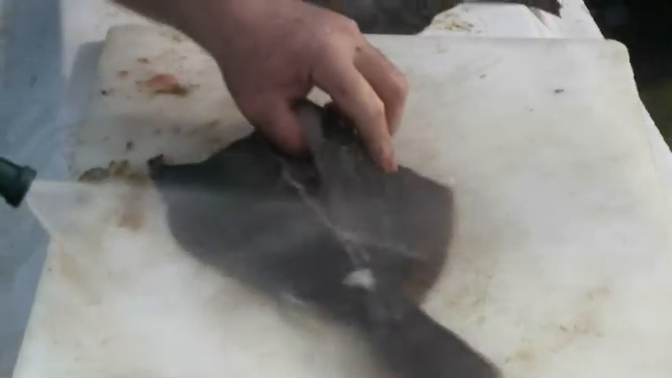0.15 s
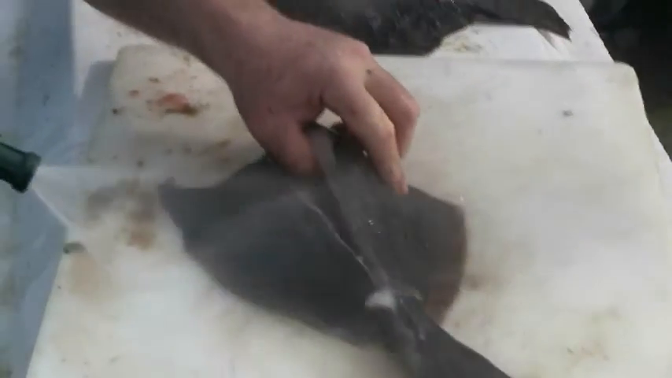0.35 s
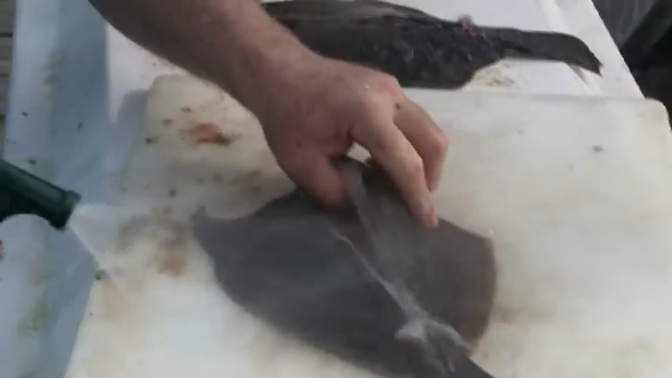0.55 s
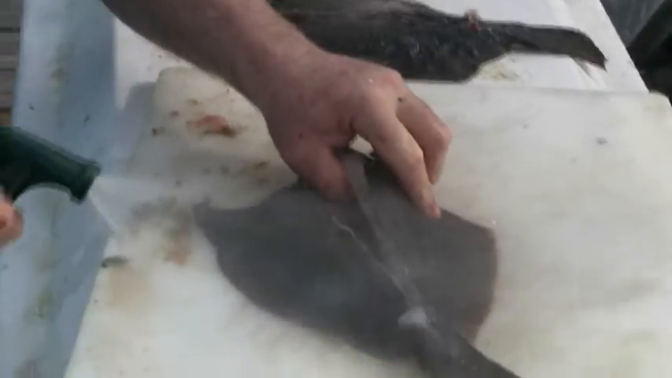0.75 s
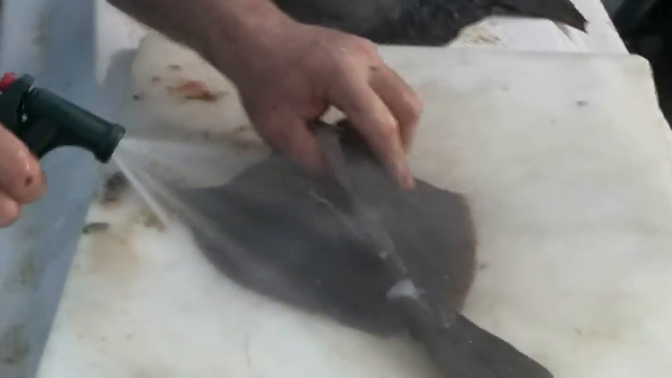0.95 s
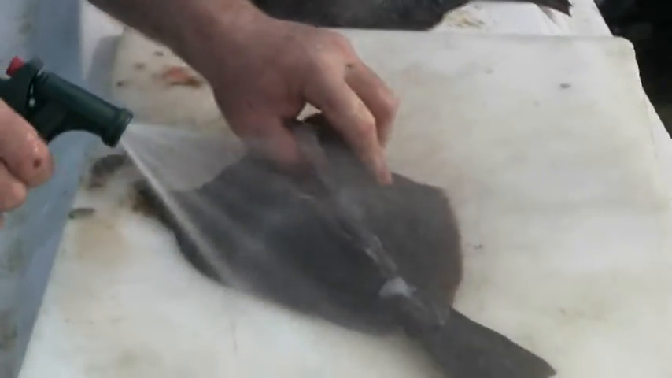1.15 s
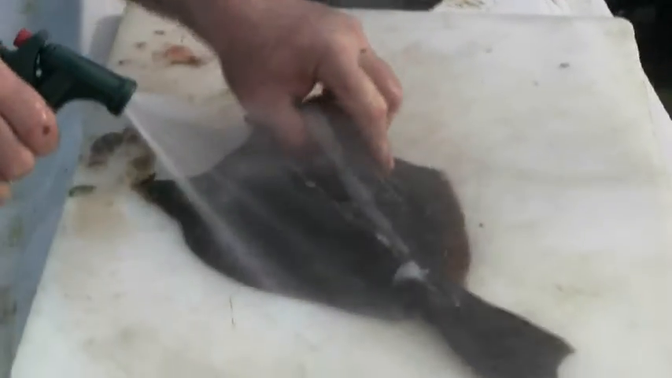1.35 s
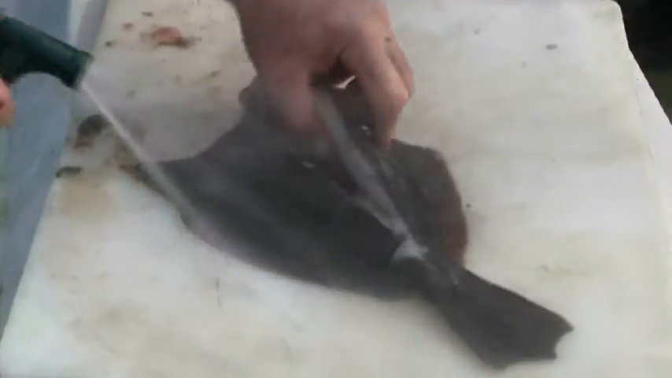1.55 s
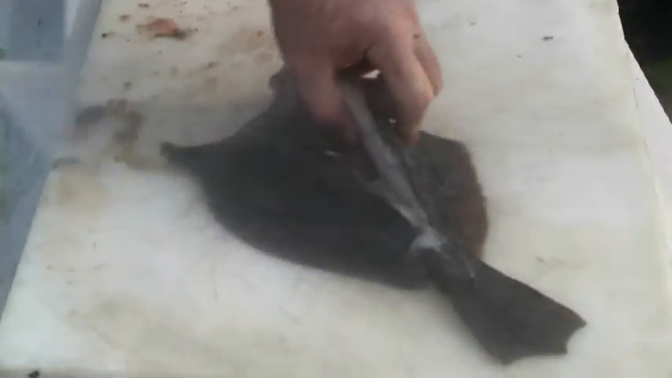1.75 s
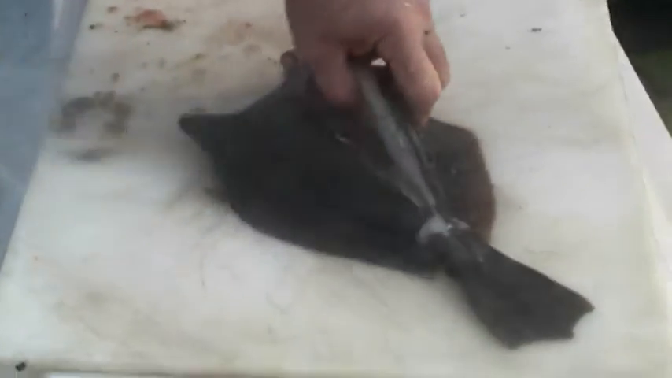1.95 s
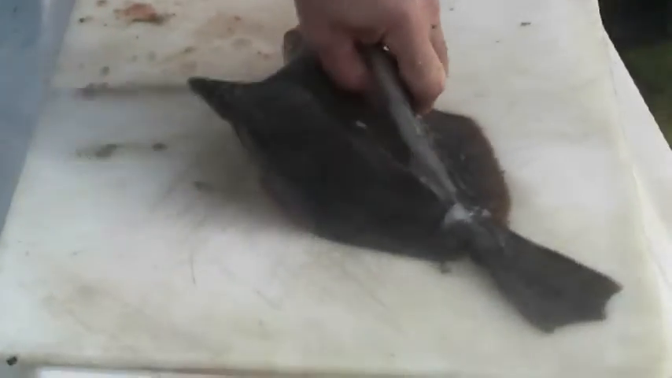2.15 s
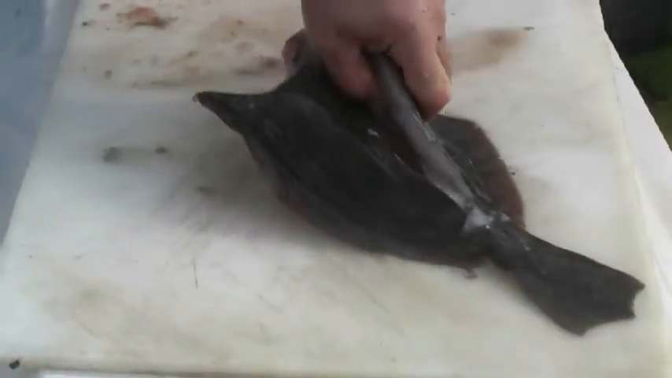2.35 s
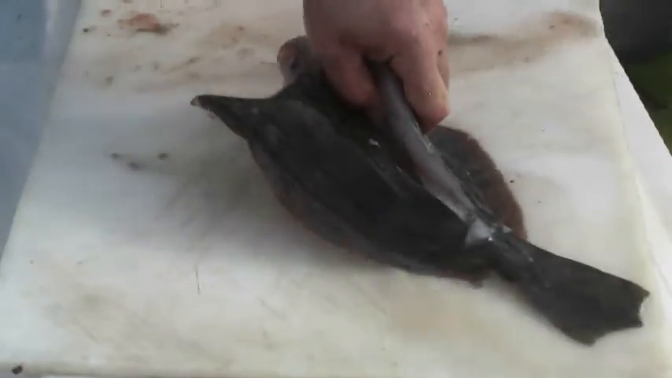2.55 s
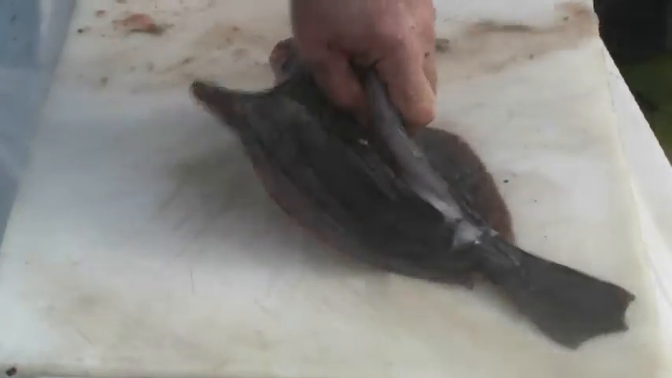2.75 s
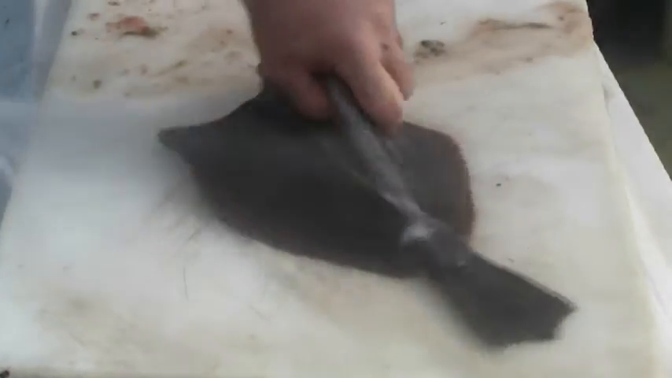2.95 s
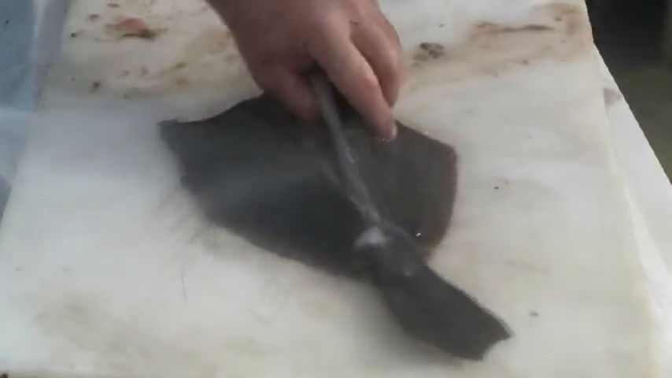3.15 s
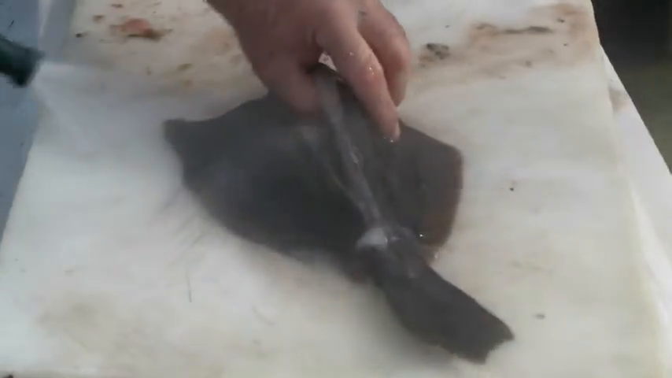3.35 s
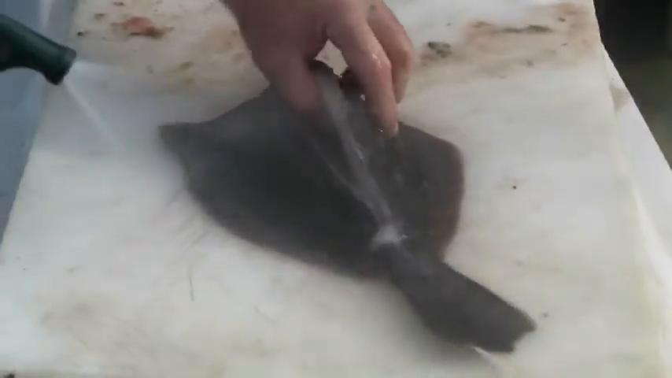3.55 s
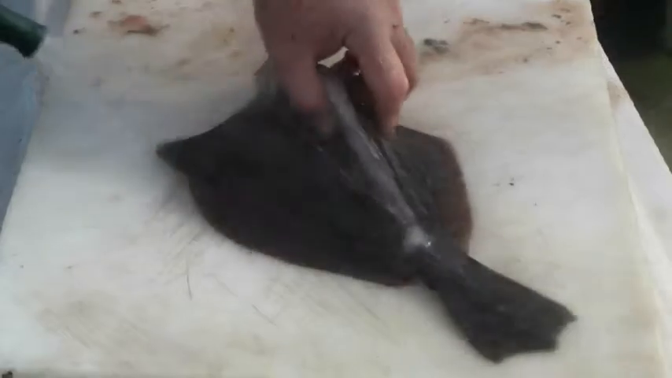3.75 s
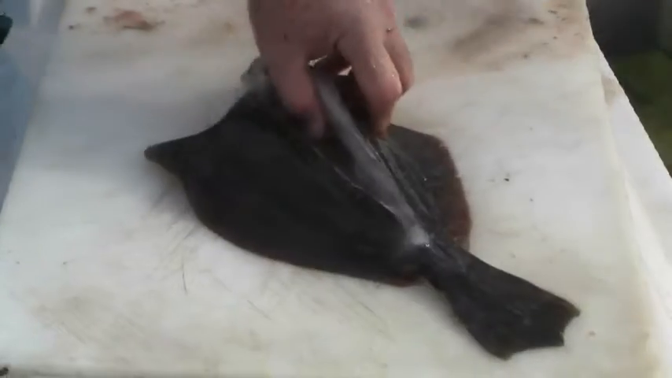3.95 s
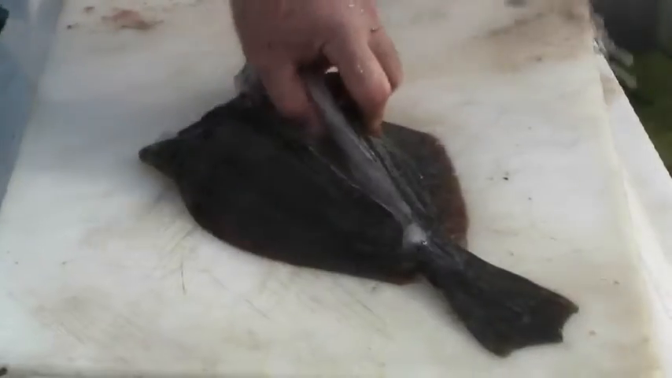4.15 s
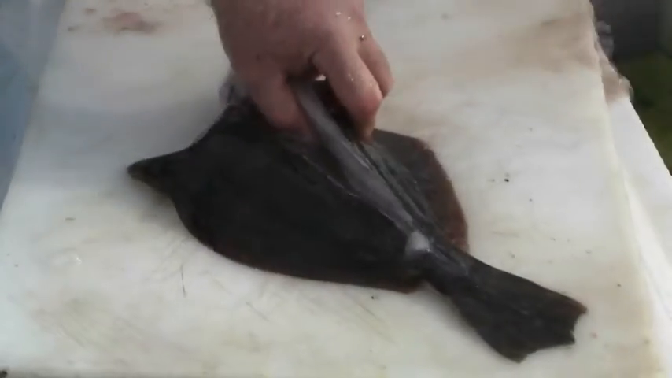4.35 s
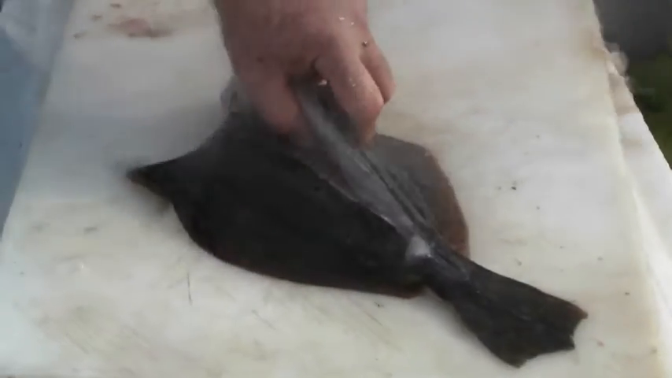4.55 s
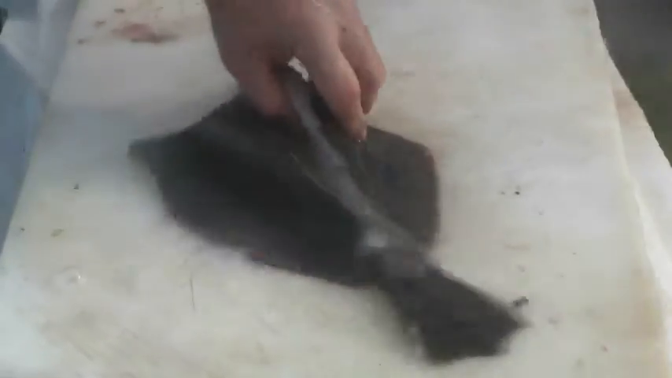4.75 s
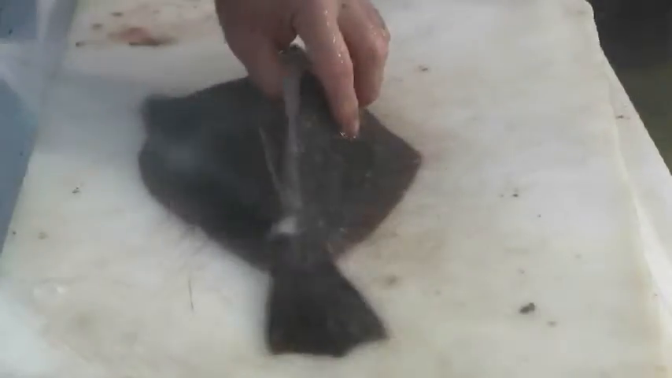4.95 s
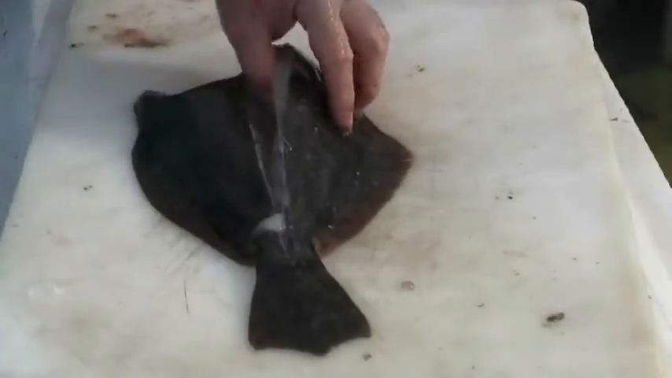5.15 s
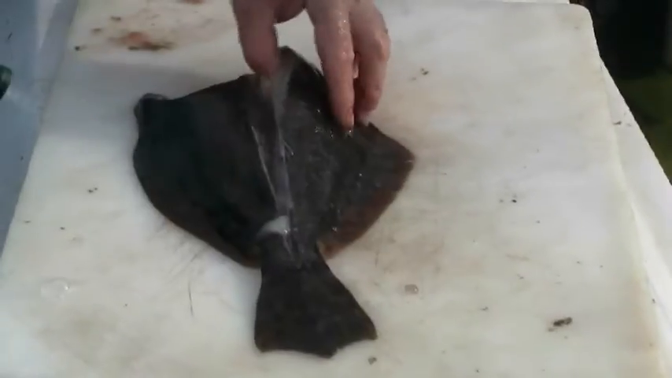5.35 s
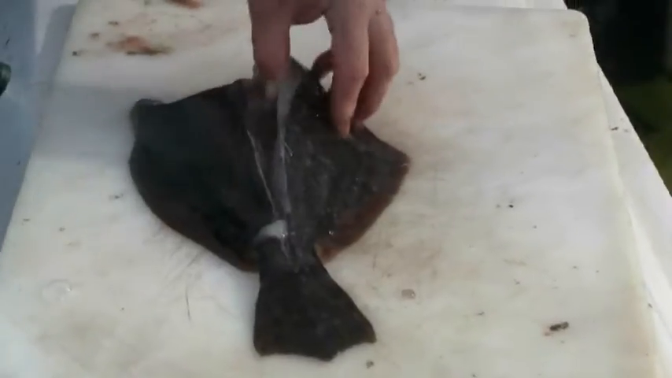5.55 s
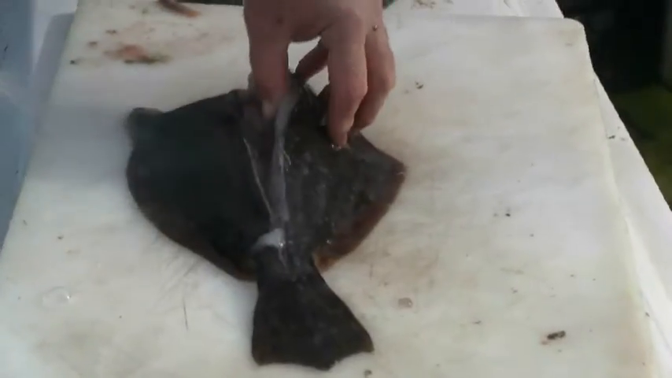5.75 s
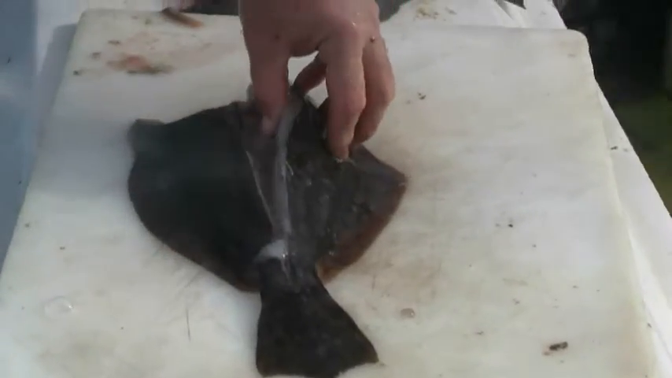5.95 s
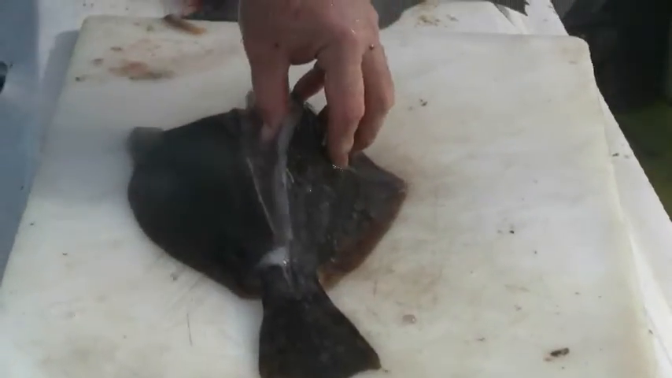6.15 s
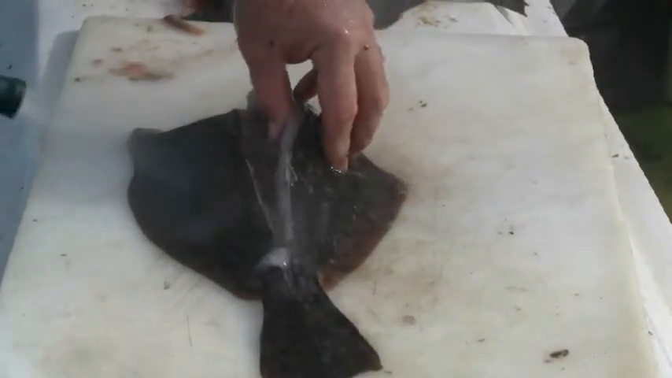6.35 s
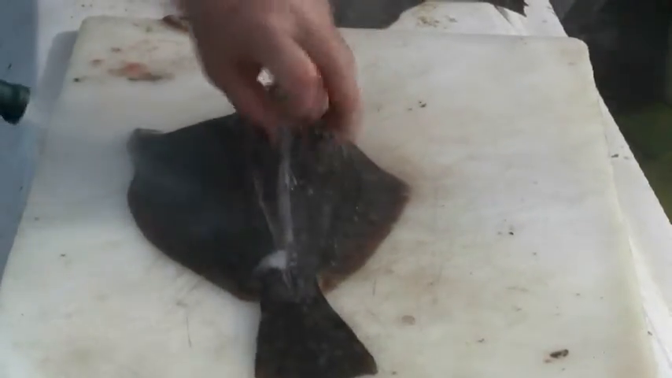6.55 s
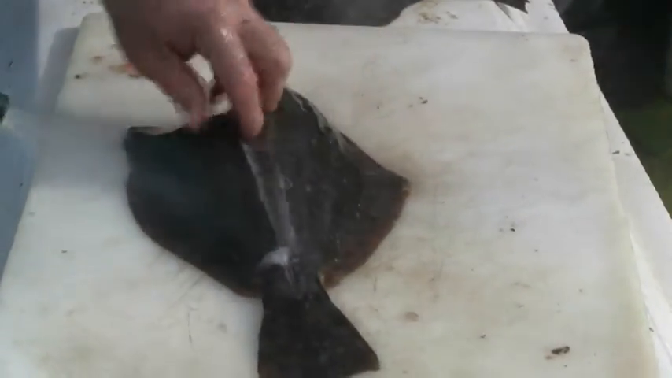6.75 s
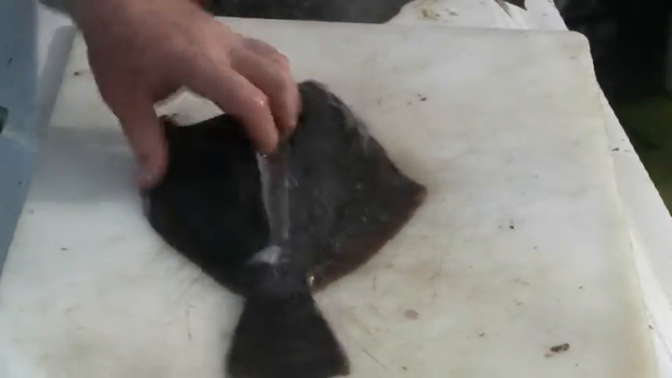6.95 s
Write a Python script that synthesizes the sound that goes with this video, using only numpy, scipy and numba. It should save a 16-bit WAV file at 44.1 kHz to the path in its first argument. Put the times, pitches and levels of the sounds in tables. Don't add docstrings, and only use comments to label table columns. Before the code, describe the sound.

Outdoors and close to a handheld stereo microphone, a hose nozzle sprays a steady bright hiss onto a flat fish on a plastic board, its tone shifting as it moves. Soft thuds and a couple of slaps come through. The spray shuts abruptly with a click; water drains amid small ticks and scuffs, a thin mist returns, and a loud sharp slap lands near the end.

```python
import sys
import numpy as np
from scipy import signal
from scipy.fft import rfft, irfft, next_fast_len
from scipy.io import wavfile
from scipy.ndimage import uniform_filter1d, map_coordinates
from numba import njit

SR = 44100
rng = np.random.default_rng(int(sys.argv[2]) if len(sys.argv) > 2 else 0)


def transcribe(u):
    v = np.clip(np.atleast_2d(u).T, -1, 1)
    q = np.round(v * 32767).astype(np.int16)
    wavfile.write(sys.argv[1], SR, q)


def elevation(decibels):
    levels = np.asarray(decibels, float)
    return 10 ** (levels / 20)


N = 312669

# time_s, flow_db, turn_to_board (0-1), echo_delay_ms, landing_force_db
NOZZLE = [(.25, -30, 0.06, 0.43, 2), (.6, -30, 0, 0.48, 1), (.95, -30.5, 0.06, 0.41, 1),
          (1.35, -29, 0.07, 0.46, 0), (1.5, -28.5, 0, 0.27, 0.5), (1.75, -29, 0.12, 0.31, 0.5),
          (1.95, -29.5, 0.2, 0.22, 0), (2.2, -28, 0.4, .175, -.5), (2.5, -27, 0.33, 0.16, -0.5),
          (2.75, -28, 0.37, 0.2, -1), (3.0, -29, 0, 0.22, -0.5), (3.3, -29.5, 0.1, .32, 0),
          (3.7, -27.5, 0, 0.43, -1.1), (3.95, -28.5, 0.3, 0.49, -0.5), (4.2, -29, 0.5, 0.35, -1.5),
          (4.52, -29, 0.34, .365, -1), (4.75, -28, 0.3, 0.426, -2.5), (5.1, -28.5, 0.07, .5, -3.5)]
# pitch_hz, level_db (per Hz)
SPRAY_COLOUR = [(71, -40), (120, -22.5), (220, -12.5), (400, -4.5), (1200, 0.5), (3500, -6.5), (6300, -2.5),
                (10000, -3.5), (15500, -8)]
# pitch_hz, level_db
SPRAY_WIDTH = [(100, -9), (500, -10.5), (1500, -31), (4000, -6.5), (8000, -7.5), (14000, -0.5)]
# lowest_hz, highest_hz, drops_per_s, cycles_rung, size_scatter_db, share_over_hiss_db, flicker_db
MIST = (3998, 9795, 8993, 0.5, 3.5, -6, 0.95)
FINE_MIST = (9800, 15998, 8995, 0.5, 7.5, -7, 1)
SPLASH = (1531, 3993, 2488, 3, 3.0, -7, 0.35)
DRUMMING = (150, 1476, 906, 6.5, 2.5, -6, 1.06)
FINE_DB, FINE_TURN_DB = 0, -11.5
SPLASH_DB, DRUM_DB, DRUM_FOLLOWS = -2.5, -5, 1.33
OPEN_S, OPEN_DB_S, SPURT_DB, SPURT_S, FLIGHT_S = 0.11, 1498, 0, 0.03, 0.0091
SHUT_S, SHUT_DB_S = 5.146, 529
# time_s, mist_db
SEEP = [
    (5.3, -68),
    (5.5, -53),
    (5.8, -48),
    (5.843, -47),
    (5.862, -41.5),
    (6.25, -39),
    (6.55, -39.5),
    (6.78, -42.5),
    (7.09, -61.5),
]
SEEP_FINE_DB, SEEP_SPLASH_DB, SEEP_DRUM_DB = 0.5, -5.5, -8.5
# peak_s, splash_db, rise_s (before the peak), fade_db_per_s,
# drumming_over_splash_db
RUNOFF = [
    (5.2, -42, 0.081, 35, -0.5),
    (5.31, -42.5, 0.037, 55, -8),
    (5.679, -51, .1, 43, 1),
    (6.775, -43, 0.028, 54, 4),
]
RUNOFF_MIST_DB = -4.5
DAMP_DB = (-74, -73, -70, -57)
ECHO_HZ, ECHO_SHARE, ECHO_TURN = 3240, 0.14, 0.42
REPEAT_PATH, PORT_LAG_MS = 2.1, 0.01
HAND_HZ, HAND_WIDTH_HZ, HAND_DB, HAND_TURN_DB = 7770, 1040, -3.5, 14.5

# pitch_hz, width_hz, level_db, t60_s
BOARD = [(278, 173, -8, 0.13), (460, 214, -5, 0.17), (730, 840, -6.5, 0.21), (1380, 780, -1.5, 0.13),
         (2230, 1160, -7, 0.12)]
BOARD_LOW_HZ = 137
CONTACT_CYCLES = 0.45
# start_s, peak_db, brightness_db_per_octave, ring_length_factor
SLAPS = [
    (2.281, -8.5, -1, 1.1),
    (3.199, -14.5, 2.5, 0.46),
    (6.761, -16, -0.5, 0.88),
]
SLAP_RATTLE, SLAP_PIVOT_HZ = 0.52, 1020
# start_s, peak_db, ring_hz, t60_s
THUDS = [(.152, -25.5, 270, 0.11), (1.044, -34, 300, .05), (1.139, -27, 240, .077), (2.19, -20, 238, 0.22),
         (2.255, -19, 604, 0.2), (2.81, -20.5, 700, .06), (2.85, -25, 650, .06), (3.075, -23, 362, 0.19),
         (3.387, -18.5, 289, 0.44), (3.389, -17.5, 894, .08), (3.44, -17, 500, .17), (3.486, -23, 328, .08),
         (4.467, -20, 780, 0.055), (5.238, -26.5, 650, 0.082), (5.494, -25.5, 170, .25),
         (5.555, -36, 200, .15), (6.723, -23, 183, 0.56), (6.815, -33, 230, 0.17), (6.844, -28, 190, .2)]
# start_s, peak_db, ring_hz, t60_s
TICKS = [(.04, -44, 6000, .03), (5.135, -19.5, 1220, 0.1), (5.182, -35, 7000, .015),
         (5.187, -33, 2300, .03), (5.204, -30, 4500, .015), (5.274, -35, 6500, .015),
         (5.293, -23.5, 9000, .015), (5.298, -24, 2020, 0.059), (5.31, -39, 9000, .015),
         (5.326, -29, 9500, .02), (5.34, -31, 2500, .03), (5.423, -37, 9500, .015), (5.44, -38, 4900, .015),
         (5.513, -22, 1690, .052), (5.615, -32, 4500, .015), (5.695, -32.5, 2800, .054),
         (5.781, -34, 1500, 0.043), (5.85, -27.5, 3150, .03), (6.753, -18, 3170, 0.053),
         (6.7635, -7.5, 2200, .04), (6.76, -21, 8050, .03), (6.769, -17, 1940, 0.13),
         (6.774, -19, 2230, 0.039)]
# start_s, peak_db, ring_hz, t60_s
SCUFFS = [(.048, -42.5, 4300, 0.11), (3.359, -21.5, 1100, 0.06), (5.18, -31, 2200, 0.38),
          (5.215, -36, 1100, 0.23), (5.284, -22, 1930, 0.18), (5.45, -35, 1140, 0.22),
          (5.56, -37, 1500, .2), (5.63, -34.5, 650, 0.28), (6.767, -15, 1920, 0.19),
          (6.762, -22, 4000, 0.11), (3.39, -24, 900, 0.16), (2.29, -18.5, 1300, 0.19),
          (5.69, -35, 780, 0.18), (5.389, -33.5, 1080, .3), (5.519, -29.5, 1810, 0.35),
          (5.53, -31.5, 690, 0.14), (5.7, -35, 476, 0.26), (5.712, -33, 1200, 0.18),
          (6.748, -23, 1450, .12)]
# start_s, peak_db, ring_hz, t60_s
CRACKS = [
    (5.2805, -13, 2200, .03),
    (6.222, -24, 8000, .015),
    (6.7597, -1.5, 2300, .02),
    (2.2815, -6.5, 1300, .04),
    (3.2, -19, 1450, .08),
]
THUD, TICK, SCUFF, CRACK = (0.6, 0.48), (0.31, 0.43), (0.23, 0.9), (0.7, 0.1)
# start_s, peak_db, start_hz, end_hz, length_s
POCKETS = [(1.438, -27.5, 333, 370, 0.056), (1.475, -33, 370, 620, .055), (1.515, -29.5, 613, 660, 0.042),
           (1.742, -34, 1123, 1055, 0.066), (1.945, -30.5, 558, 650, 0.032),
           (2.983, -32.5, 1200, 1250, 0.028), (3.866, -22.5, 2470, 2500, 0.013),
           (3.875, -22.5, 2550, 2630, 0.014), (3.887, -25, 2200, 1880, .012),
           (4.879, -32, 1130, 1190, .015), (4.46, -31, 760, 820, 0.022), (5.523, -38, 1940, 2050, .045),
           (5.71, -38.5, 1145, 1170, 0.033), (3.9, -26, 1800, 1500, 0.027), (5.619, -41, 613, 686, 0.034),
           (6.785, -29.5, 728, 755, 0.037), (6.849, -32.5, 279, 620, 0.0415), (6.869, -35, 700, 950, 0.033),
           (6.957, -45, 1285, 1290, 0.011), (6.996, -47, 2630, 2770, 0.047),
           (7.025, -42, 1150, 1250, 0.024), (7.048, -47, 1350, 1400, .025)]

YARD_T60_S, YARD_DB, YARD_HZ = 0.43, -18.5, 2500
# pitch_hz, level_db (per Hz)
AIR_COLOUR = [(45, -10.5), (100, 4), (250, -1.5), (600, -3), (1300, -7), (2500, -13.5), (6000, -25),
              (14000, -45)]
AIR_DB = -48
HUM_HZ, HUM_DB = 59.3, -63
# pitch_hz, wander_hz, level_db
ENGINE_TONES = [(69.4, 1.14, 4.5), (95.6, 1.38, 2.5)]
# time_s, level_db
ENGINE_LEVEL = [(0, -63), (3.4, -64), (4.6, -57.5), (5.4, -57), (6.2, -54), (7.09, -57)]

# pitch_hz, width_hz, level_db
HOUSING = [(1900, 510, -3), (2550, 950, 3), (3080, 850, 0.5), (950, 97, -1), (6080, 1050, 3),
           (8360, 580, 2.5)]
# pitch_hz, width_hz, level_db
LEFT_PORT = [(370, 240, 2.5), (6740, 910, 1.5), (8650, 900, 2), (9330, 730, -6), (11900, 1300, -4),
             (14130, 4900, 7.5)]
# pitch_hz, width_hz, level_db
RIGHT_PORT = [(2200, 480, -4.5), (7660, 900, 0), (9000, 1300, 2.5), (11500, 1200, 2.5), (15300, 2200, -4)]
# from_hz, needed_hiss_db
TOP_BANDS = [(13900, -53.5), (14700, -43), (15300, -30.5)]
LOW_CUT_HZ, LAST_HZ = 40, 15750
TOP_HZ, OVER_TOP_DB = 15300, 2


def spray():
    gains = flows()
    kinds = (MIST, FINE_MIST, SPLASH, DRUMMING)
    mist, fine, splash, drum = (gain * drops(*kind) for gain, kind in zip(gains, kinds))
    width = np.array(SPRAY_WIDTH)
    wide = [(hz, db + np.interp(np.log(hz), np.log(width[:, 0]), width[:, 1])) for hz, db in SPRAY_COLOUR]
    side = colour(rng.standard_normal(N), wide) * elevation(-2.5)
    side = side * gains[0] * (gains[1] / gains[0]) ** 0.1
    water = off_board(mist + fine) + splash + drum + side * np.array([[1], [-1]])
    return elevation(0.51 * walk(4.4) - 0.39) * water


def flows():
    t = np.arange(N) / SR

    def gate_db(late):
        opening = np.minimum(OPEN_DB_S * (t - OPEN_S - late), 0)
        return opening - SHUT_DB_S * np.maximum(t - SHUT_S, 0)

    jet_db = curve(NOZZLE, 1) + SPURT_DB * np.exp(-np.maximum(t - OPEN_S, 0) / SPURT_S)
    force_db = curve(NOZZLE, 4)
    in_air, landed = gate_db(0), gate_db(FLIGHT_S)
    jet = jet_db + np.array([in_air,
                             in_air + FINE_DB + FINE_TURN_DB * curve(NOZZLE, 2),
                             landed + SPLASH_DB + force_db,
                             landed + DRUM_DB + DRUM_FOLLOWS * force_db])
    seep = curve(SEEP, 1) + np.array([[0], [SEEP_FINE_DB], [SEEP_SPLASH_DB], [SEEP_DRUM_DB]])
    power = elevation(2 * jet) + elevation(2 * seep) * (t > SHUT_S) + elevation(2 * np.array(DAMP_DB))[:, None]
    for s, db, rise, fade_db, drum_db in RUNOFF:
        run = np.clip(1 + (t - s) / rise, 0, 1) * elevation(db - fade_db * np.maximum(t - s, 0))
        shares = np.array([[elevation(RUNOFF_MIST_DB)], [0], [1], [elevation(drum_db)]])
        power = power + (run * shares) ** 2
    return np.sqrt(power)


def drops(lo_hz, hi_hz, rate, cycles, scatter_db, share_db, flicker_db):
    when, pitch, size = rng.random((3, int(rate * N / SR)))
    hz = lo_hz * (hi_hz / lo_hz) ** pitch
    size_db = scatter_db * np.minimum(-np.log(1 - size), 4)
    grains = rings((when * N).astype(np.int64), hz, elevation(size_db), 1. * cycles, 0.25)
    grains = elevation(share_db) * colour(grains, SPRAY_COLOUR, lo_hz, hi_hz)
    hiss = colour(rng.standard_normal(N), SPRAY_COLOUR, lo_hz, hi_hz)
    return elevation(flicker_db * walk(12)) * (grains + hiss) / np.sqrt(1 + elevation(2 * share_db))


@njit
def rings(start, hz, size, cycles, glide):
    out = np.zeros(N)
    for k in range(len(start)):
        turn = 2 * np.pi * hz[k] / SR
        n = int(2 * cycles * SR / hz[k])
        z, p = 1. + 0j, np.exp(1j * turn - 5. / n)
        bend = np.exp(1j * turn * glide / n)
        for i in range(start[k], min(start[k] + n, N)):
            out[i] += size[k] * z.imag
            z, p = z * p, p * bend
    return out


def off_board(x):
    turned = curve(NOZZLE, 2)
    share = np.clip((ECHO_SHARE + ECHO_TURN * turned) * elevation(0.79 * walk(5.3)), 0, 0.8)
    share = share * (np.arange(N) < SHUT_S * SR)
    mirrored = signal.filtfilt(*signal.butter(1, ECHO_HZ, "high", fs=SR), x)
    lag = (curve(NOZZLE, 3) + PORT_LAG_MS * np.array([[1], [-1]])) * SR / 1000
    late = 0
    for path in (1, REPEAT_PATH):
        late = late + share ** path * map_coordinates(mirrored, [np.arange(N) - path * lag], order=3)
    hand_band = signal.lfilter(*signal.iirpeak(HAND_HZ, HAND_HZ / HAND_WIDTH_HZ, SR), x)
    shaded = (elevation(HAND_DB + HAND_TURN_DB * turned) - 1) * hand_band
    return (x + late + shaded * np.array([[1], [0]])) / np.sqrt(1 + share ** 2 / 2)


def knocks():
    out = np.zeros(N + SR)
    for s, peak_db, tilt_db, longer in SLAPS:
        for hz, width, db, t60 in BOARD:
            level_db = peak_db + db + tilt_db * np.log2(hz / SLAP_PIVOT_HZ)
            add_blow(out, s, level_db, hz, width, t60 * longer, SLAP_RATTLE)
    for blows, (wide, rattle) in ((THUDS, THUD), (TICKS, TICK), (SCUFFS, SCUFF), (CRACKS, CRACK)):
        for s, peak_db, hz, t60 in blows:
            add_blow(out, s, peak_db, hz, wide * hz, t60, rattle)
    return signal.lfilter(*signal.butter(2, BOARD_LOW_HZ, "high", fs=SR), out[:N])


def add_blow(out, s, peak_db, hz, width, t60, rattle):
    t = np.arange(SR // 2) / SR
    bounces = rng.standard_normal(len(t)) * elevation(3.5 * rng.standard_normal(len(t) // 50).repeat(50))
    push = rattle * bounces * elevation(-60 * t / t60) * np.sqrt(width / SR)
    push[0] += 1.2 - rattle
    push = np.convolve(push, np.hanning(3 + int(CONTACT_CYCLES * SR / hz)))[:len(t)]
    ring = signal.lfilter(*signal.iirpeak(hz, hz / width, SR), push)
    ring = signal.lfilter(*signal.iirpeak(hz, hz / width / 2, SR), ring)
    loudest = ring[np.abs(ring).argmax()]
    out[int(s * SR):int(s * SR) + len(t)] -= elevation(peak_db) * ring / loudest


def pockets():
    out = np.zeros(N + SR)
    for s, peak_db, start_hz, end_hz, length in POCKETS:
        u = np.arange(int(length * SR)) / (length * SR)
        phase = 2 * np.pi * np.cumsum(start_hz * (end_hz / start_hz) ** u) / SR
        swell = np.sin(np.pi * u ** 0.74)
        out[int(s * SR):int(s * SR) + len(u)] += elevation(peak_db) * swell * np.sin(phase)
    return out[:N]


def yard(x):
    t = np.arange(SR // 2) / SR
    mid, side = rng.standard_normal((2, len(t))) * elevation(-60 * t / YARD_T60_S) * np.clip(t / 0.031, 0, 1)
    tail = mid + 0.69 * side * np.array([[1], [-1]])
    tail = signal.lfilter(*signal.butter(1, YARD_HZ, fs=SR), tail)
    tail = tail / np.sqrt(np.sum(tail[0] ** 2))
    return elevation(YARD_DB) * signal.fftconvolve(x[None], tail)[:, :N]


def outdoors():
    mid, side = colour(rng.standard_normal((2, N)), AIR_COLOUR)
    air = elevation(AIR_DB + 1.0 * walk(3.7)) * (mid + 0.31 * side * np.array([[1], [-1]]))
    hum = elevation(HUM_DB + 4 + 0.87 * walk(2.1)) * np.sin(2 * np.pi * HUM_HZ * np.arange(N) / SR)
    engine = np.zeros(N)
    for hz, wander, db in ENGINE_TONES:
        phase = 2 * np.pi * np.cumsum(hz + wander * walk(5.5)) / SR
        engine += elevation(db + 2.8 * walk(3.2)) * np.sin(phase)
    return air + hum + elevation(curve(ENGINE_LEVEL, 1)) * engine


def curve(table, column):
    rows = np.array(table)
    return np.interp(np.arange(N) / SR, rows[:, 0], rows[:, column])


def colour(x, table, lo_hz=1, hi_hz=30000):
    size = next_fast_len(N)
    hz = np.fft.rfftfreq(size, 1 / SR) + 1e-3
    rows = np.array(table)
    gain = elevation(np.interp(np.log(hz), np.log(rows[:, 0]), rows[:, 1]))
    gain /= np.sqrt((1 + (lo_hz / hz) ** 8) * (1 + (hz / hi_hz) ** 8))
    y = irfft(rfft(x, size) * gain, size)[..., :N]
    return y / np.sqrt(np.mean(y ** 2))


def walk(rate):
    hold = int(SR / rate)
    steps = np.repeat(rng.standard_normal(N // hold + 1), hold)
    return 1.3 * uniform_filter1d(uniform_filter1d(steps, hold), hold)[:N]


def scene():
    water = spray()
    handling = knocks() + pockets()
    return water + handling + yard(handling + 0.5 * water.mean(axis=0)) + outdoors()


def bell(hz, width, db):
    w, a = 2 * np.pi * hz / SR, elevation(db / 2)
    k = np.sin(w) * width / hz / 2
    middle = -2 * np.cos(w)
    return np.array([1 + k * a, middle, 1 - k * a, 1 + k / a, middle, 1 - k / a]) / (1 + k / a)


def tops(ports):
    size = next_fast_len(N)
    hz = np.fft.rfftfreq(size, 1 / SR)
    tones = rfft(ports, size) * (hz < LAST_HZ) / np.sqrt(1 + (LOW_CUT_HZ / (hz + 1)) ** 16)

    def band(lo, hi):
        return irfft(tones * (hz >= lo) * (hz < hi), size)[:, :N]

    hiss = np.sqrt(uniform_filter1d(band(10000, 13900).mean(axis=0) ** 2, 4096) + 1e-18)
    edges = [row[0] for row in TOP_BANDS] + [LAST_HZ]
    out = band(0, edges[0])
    for (lo, needs_db), hi in zip(TOP_BANDS, edges[1:]):
        is_open = uniform_filter1d(1. * (hiss > elevation(needs_db)), 1024)
        out = out + band(lo, hi) * is_open * elevation(OVER_TOP_DB * (lo >= TOP_HZ))
    return out


def roll_off(x):
    return signal.sosfilt(signal.butter(12, 16450, fs=SR, output="sos"), x)


def record(dry):
    ports = []
    for port, x in zip((LEFT_PORT, RIGHT_PORT), dry):
        ports.append(signal.sosfilt([bell(*row) for row in HOUSING + port], x))
    mix = tops(np.array(ports))
    return roll_off(mix)


dry = scene()
out = record(dry)
transcribe(out)
```